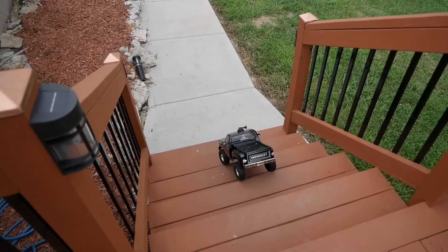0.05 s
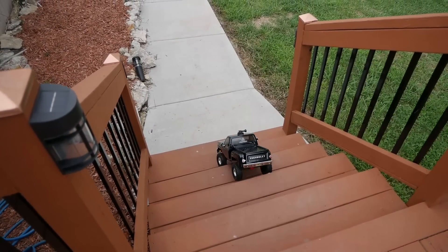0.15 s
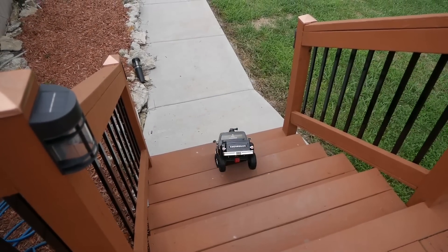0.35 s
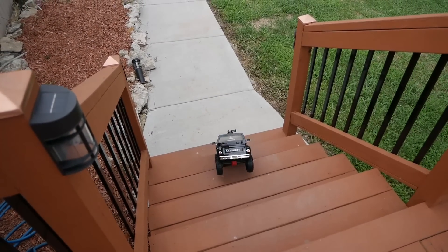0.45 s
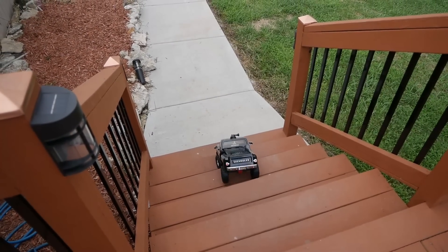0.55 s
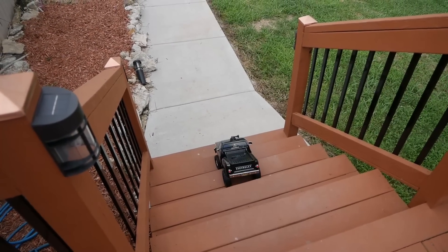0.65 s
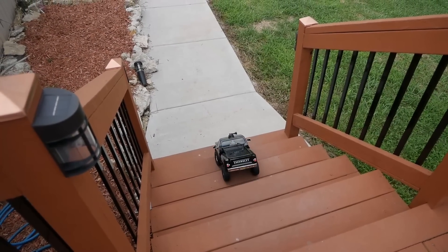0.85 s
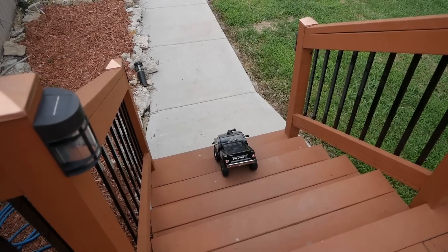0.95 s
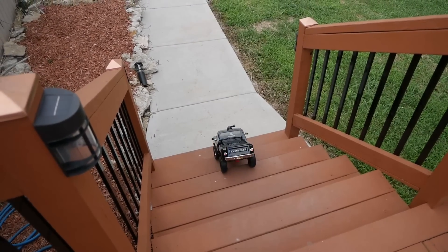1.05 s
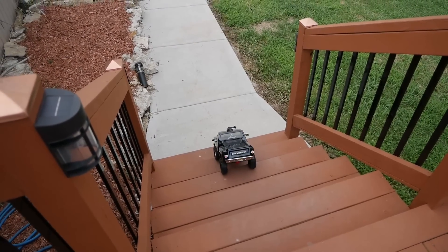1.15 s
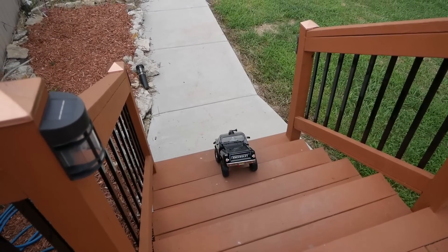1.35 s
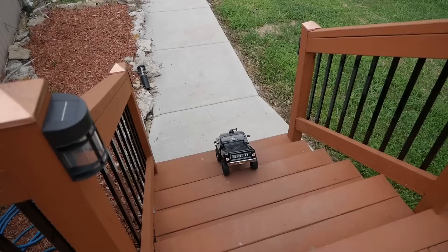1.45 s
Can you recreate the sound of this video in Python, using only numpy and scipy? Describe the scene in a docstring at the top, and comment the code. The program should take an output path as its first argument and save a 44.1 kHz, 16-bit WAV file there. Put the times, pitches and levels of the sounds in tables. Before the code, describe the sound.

A small toy truck whirs briefly, then knocks sharply onto hollow wooden steps at about 0.2 seconds and again from 0.6, its plastic rattling and its tyres rumbling and rasping. The gears whir again from 0.8 as light wind swells on the microphone. Softer knocks come at 1.1 and 1.2, then a last whir with tiny squeaks at 1.4. Faint insects hiss far off throughout.

```python
"""Outdoors, near hollow wooden deck steps, nearly mono; insects hiss far off throughout.
A small toy crawler truck whirs its gearbox, then drops at 0.24 s and again from 0.62 s: wheels and
chassis knock on the boards, loose plastic rattles, the sliding tyres rumble and rasp. The gears whir
again from 0.8 s as wind swells on the microphone. Lighter knocks follow at 1.1 and 1.2 s, and a last
burst of the gearbox, with short squeaks, starts at 1.4 s."""
import sys
import numpy as np
from scipy import signal
from scipy.fft import rfft, irfft
from scipy.io import wavfile
from scipy.ndimage import uniform_filter1d

SR = 44100
rng = np.random.default_rng(int(sys.argv[2]) if len(sys.argv) > 2 else 0)


def waveform_to_disk(signal):
    """Save audio, clipped to [-1, 1], as 16-bit WAV at the path in sys.argv[1]."""
    frames = np.transpose(np.atleast_2d(signal))
    scaled = np.clip(frames, -1, 1) * 32767
    samples = np.round(scaled).astype(np.int16)
    wavfile.write(sys.argv[1], SR, samples)


N = 66150  # 1.5 s

# Wheels and chassis landing: t/s, peak level/dB, contact cut-off f/Hz, ring time/s, favoured f/Hz
KNOCKS = [(.2351, -14, 400, .014, 140), (.2351, -8, 800, .010, 430), (.2403, -7, 1000, .007, 480),
          (.6288, -12, 900, .018, 476), (.2443, -14, 3000, .004, 1000), (.6215, -19, 500, .015, 400),
          (.626, -24, 180, .016, 120), (.6757, -16, 900, .033, 250), (.634, -12, 1500, .012, 1100),
          (.671, -15, 2000, .01, 1100), (.68, -15, 1500, .012, 500), (1.114, -34, 2000, .016, 770),
          (1.2225, -24, 2500, .03, 700), (1.2235, -27, 3000, .025, 1600)]

def knocks():
    """Each knock is a short push on the boards; they ring briefly, then the ring is cut off quickly."""
    out, t = np.zeros(N + SR), np.arange(SR // 5) / SR
    scatter_db = 1.5 * rng.standard_normal((len(KNOCKS), len(STEP_MODES)))
    for (start, db, contact_hz, ring_s, spot_hz), scatter in zip(KNOCKS, scatter_db):
        push = soften(t == 0, contact_hz)
        ring = boards(push, spot_hz, spot_db=14, scatter_db=scatter)
        fade = np.exp(-(t / ring_s) ** 3)
        ring = highpass(ring * fade, hz=85)  # the boards radiate little bass
        out[int(start * SR):][:len(t)] += amp(db) * ring / np.abs(ring).max()
    return out[:N]


# Resonances of the hollow steps: f/Hz, level/dB, t60/s at damping 1
STEP_MODES = [(138, -11, 0.11), (260, -14, 0.19), (334.8, -5, 0.16), (392.6, -2.5, 0.044), (469, -4, 0.14),
              (622, -4.5, 0.038), (752.5, -3, 0.12), (830, -1, 0.037), (1068, -6.5, 0.09),
              (1235, -5, 0.034), (1362, -5.5, 0.066), (1662, -8, 0.06), (1950, -4, 0.022)]

def boards(force, spot_hz, spot_db, damping=1, scatter_db=0):
    """The boards ring in all their modes; those near the resonance of the touched spot are favoured."""
    octaves_off = np.log2(np.array(STEP_MODES)[:, 0] / spot_hz)
    extra_db = spot_db * np.exp(-(octaves_off / .35) ** 2) + scatter_db
    out = 0
    for k, (hz, db, t60) in enumerate(STEP_MODES):
        r, w = amp(-60 * damping / (t60 * SR)), 2 * np.pi * hz / SR
        mode = signal.lfilter([0, np.sin(w)], [1, -2 * r * np.cos(w), r * r], force + 1e-18)
        sign = -1 if k > 5 and k % 2 == 0 else 1  # upper modes alternate
        out = out + sign * amp(db + extra_db[k]) * mode
    return out


# Tyres on the boards, one span per stretch of sliding (a long slide runs on through several): t/s, wood rumble
# level/dB, tread rasp level/dB
SLIDES = [
    [(0, -32, -38.5), (.06, -55, -57), (.118, -34, -48), (.14, -42, -47), (.2, -60, -86),
     (.218, -38.5, -52), (.235, -39.5, -73)],
    [(.246, -35, -31.5), (.28, -29, -30.5), (.34, -28.5, -36.5), (.41, -36, -48.5), (.45, -42, -47.5),
     (.47, -45.5, -79), (.58, -77, -68)],
    [(.622, -23, -44), (.632, -24, -27), (.66, -27, -31), (.69, -22, -34.5), (.73, -31.5, -39.5),
     (.76, -33, -40.5), (.79, -31, -35), (.815, -36, -48), (.88, -51, -59)],
    [(.881, -42, -60), (.91, -54.5, -63), (.97, -40.5, -39), (1.03, -53.5, -68)],
    [(1.031, -68, -61), (1.07, -38.5, -43.5), (1.098, -53.5, -84), (1.13, -45, -54), (1.21, -54.5, -66)],
    [(1.225, -32.5, -59), (1.27, -35.5, -49), (1.3, -47.5, -80), (1.39, -71, -80)],
]
# Spectrum of tread and plastic: f/Hz, level/dB
RASP_SPECTRUM = [(880, -4), (1500, -5), (2490, -13.5), (5500, -20.5), (6960, -26), (8460, -22.5),
                 (10500, -39), (13500, -36), (16000, -51)]

def tyres():
    """Tread blocks slip in a dense uneven stream: the wood rumbles, the tread rasps."""
    slips = clicks(per_s=1400, spread_db=1.5)
    force = soften(slips, hz=4300)
    spots_hz = [400, 400, 450, 770, 770, 740]  # one favoured spot per span
    rumble = 0
    for span, spot_hz in zip(SLIDES, spots_hz):
        wood = boards(force, spot_hz, spot_db=5, damping=1.74)
        rumble = rumble + unit_rms(highpass(wood, hz=205)) * envelope([span])
    friction = unit_rms(slips) + 1.53 * rng.standard_normal(N)
    rasp = unit_rms(colour(friction, RASP_SPECTRUM))
    return rumble + rasp * envelope(SLIDES, column=2)


# Loose plastic parts: t/s, level/dB, decay time/s, tilt/(dB per octave)
RATTLES = [(0.064, -55.5, 0.008, 19), (0.212, -38.5, 0.023, -2.5), (0.236, -24.5, 0.016, 2),
           (0.2412, -19, 0.005, 1), (0.378, -45, 0.01, 4), (0.629, -20.5, 0.0092, -1.5),
           (.642, -29.5, 0.012, 3), (0.654, -25.5, 0.006, 6.5), (0.6712, -22, 0.0094, -0.5),
           (0.727, -32.5, 0.017, -1), (0.937, -41, 0.015, 14.5), (1.033, -41, 0.013, 3),
           (1.1108, -38.5, 0.015, 3), (1.2214, -31, 0.012, -1), (1.242, -36, 0.02, -2)]

def rattles():
    """Loose plastic shakes in dying sprays of bright ticks."""
    out, t = np.zeros(N + SR), np.arange(4096) / SR
    attack = np.minimum(t / 0.00034, 1)
    for start, db, decay_s, tilt_db in RATTLES:
        ticks = clicks(per_s=5800, spread_db=1.6, size=len(t))
        spray = unit_rms(colour(ticks, RASP_SPECTRUM, tilt_db))
        out[int(start * SR):][:len(t)] += amp(db) * spray * attack * np.exp(-(t / decay_s) ** 2)
    return out[:N]


# Gearbox whir, one span per burst: t/s, level/dB
GEAR_BURSTS = [
    [(0, -33.5), (.071, -59.5), (.075, -37), (.1, -52)],
    [(.8, -55), (.89, -44.5), (.915, -37.5), (.94, -37), (.975, -38), (1.03, -56)],
    [(1.415, -60), (1.42, -46), (1.45, -41), (1.5, -36)],
]
# Resonances of the gear housing: f/Hz, width/Hz, level/dB
HOUSING_MODES = [(720, 210, -6.5), (1070, 420, -6), (1710, 1020, -5), (2105, 297, 3), (2380, 360, -4.5),
                 (4000, 920, -13.5), (5320, 410, -15), (8150, 1850, -22), (13500, 1800, -31.5)]
# Squeaks of the drive: centre t/s, f/Hz, level/dB, half-length/s
SQUEAKS = [(.925, 2300, -37, .006), (1.453, 2120, -38, .003), (1.478, 1050, -42, .006),
           (1.487, 3900, -43, .011)]

def gearbox():
    """Teeth tick unevenly into the resonances of the housing; now and then a narrow band squeaks."""
    teeth, t = clicks(per_s=4000, spread_db=2), np.arange(N) / SR
    whir = sum((-1) ** k * amp(db) * resonate(teeth, hz, width)
               for k, (hz, width, db) in enumerate(HOUSING_MODES))
    squeaks = 0
    for centre, hz, db, half_s in SQUEAKS:
        band = resonate(resonate(teeth, hz, width_hz=300), hz, width_hz=300)
        band /= np.sqrt(uniform_filter1d(band ** 2, size=400) + 1e-12)  # even out the level
        squeaks = squeaks + amp(db) * band * np.exp(-((t - centre) / half_s) ** 2)
    return unit_rms(whir) * envelope(GEAR_BURSTS) + squeaks


# Wind right at the microphone: t/s, level/dB
GUSTS = [(0, -54), (.76, -50.5), (1.0, -41.5), (1.25, -38.5), (1.35, -49), (1.5, -41)]

def wind():
    """Moving air presses on the microphone in slow swings."""
    pressure = soften(rng.standard_normal(N + SR), hz=27.4)[SR:]
    return unit_rms(pressure) * envelope([GUSTS])


# Background far from the deck: f/Hz, level/dB
DISTANT_SPECTRUM = [(60, 5), (135, -22), (248, -1.5), (1830, -20), (3840, -25.5), (7370, -19.5),
                    (8800, -27), (10000, -39.5), (15900, -42)]

def traffic_and_insects():
    """Far traffic and insects blend into a steady low rumble and hiss."""
    return amp(-53.5) * unit_rms(colour(rng.standard_normal(N), DISTANT_SPECTRUM))


def amp(db):
    """dB to gain."""
    return 10 ** (np.asarray(db) / 20)


def unit_rms(x):
    """Scale to rms 1."""
    return x / np.sqrt(np.mean(x ** 2) + 1e-20)


def envelope(spans, column=1):
    """Gain from spans of (t/s, level/dB, ..) rows, silent between them, edges rounded."""
    t = np.arange(N) / SR
    gain = sum(amp(np.interp(t, span[:, 0], span[:, column], -200, -200))
               for span in map(np.array, spans))
    return uniform_filter1d(gain, size=64, mode="nearest")


def colour(x, spectrum, tilt_db=0):
    """Shape by (f/Hz, level/dB) rows, closed at both ends, tilted per octave about 4 kHz."""
    hz, db = np.transpose(spectrum)
    f = np.maximum(np.arange(len(x) // 2 + 1) * SR / len(x), 1)
    shape_db = np.interp(np.log(f), np.log(hz), db, -120, -120)
    return irfft(rfft(x) * amp(shape_db + tilt_db * np.log2(f / 4000)), len(x))


def clicks(per_s, spread_db, size=N):
    """Random clicks of uneven size and sign."""
    hits = rng.random(size) < per_s / SR
    strength = amp(spread_db * np.minimum(rng.exponential(1, size), 4))
    return hits * strength * rng.choice([-1, 1], size)


def soften(x, hz):
    """Two-pole low-pass."""
    r = np.exp(-2 * np.pi * hz / SR)
    return signal.lfilter([(1 - r) ** 2], [1, -2 * r, r * r], x)


def highpass(x, hz):
    """Steep bass cut."""
    return signal.sosfilt(signal.butter(4, hz, "high", fs=SR, output="sos"), x)


def resonate(x, hz, width_hz):
    """One resonance, gain 1 at its peak."""
    r, w = np.exp(-np.pi * width_hz / SR), 2 * np.pi * hz / SR
    return signal.lfilter([(1 - r * r) / 2, 0, (r * r - 1) / 2], [1, -2 * r * np.cos(w), r * r], x)


# Faint fluttering left-right difference: f/Hz, side level/dB relative to mid
SIDE_SPECTRUM = [(60, -29), (300, -47), (4400, -24), (16000, -10)]

def scene():
    """Everything sits in the centre, with a faint, fluttering side signal, stronger in the treble."""
    mid = knocks() + tyres() + rattles() + gearbox() + wind() + traffic_and_insects()
    flutter = unit_rms(soften(rng.standard_normal(N), hz=40))
    side = colour(mid * flutter, SIDE_SPECTRUM)
    return np.array([mid + side, mid - side])


def record(dry):
    """The treble is cut steeply at about 16 kHz."""
    return signal.sosfilt(signal.cheby2(20, 70, 16050, fs=SR, output="sos"), dry)


dry = scene()
out = record(dry)
waveform_to_disk(out)
```